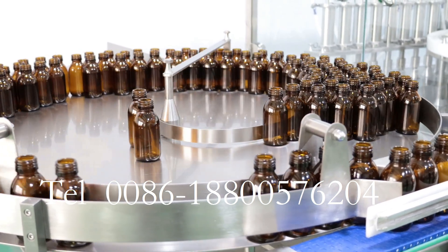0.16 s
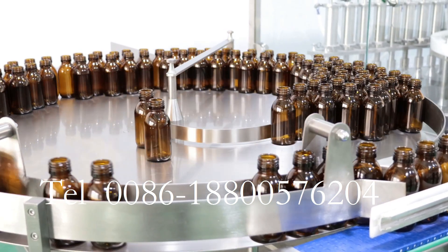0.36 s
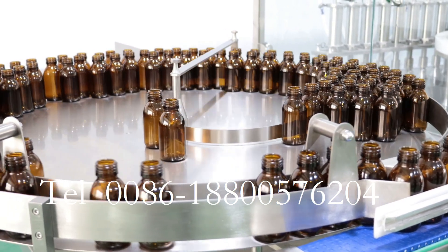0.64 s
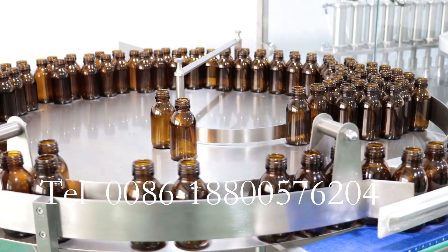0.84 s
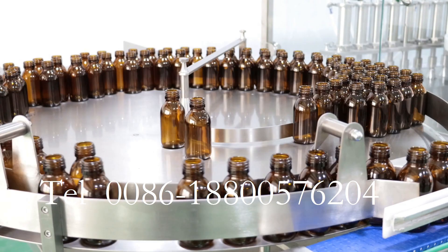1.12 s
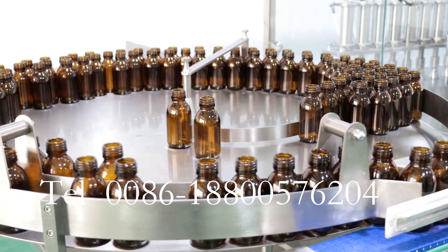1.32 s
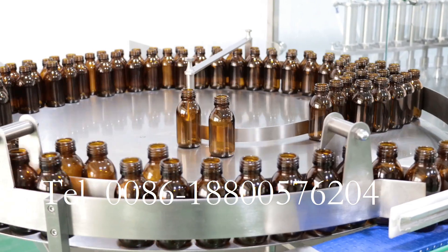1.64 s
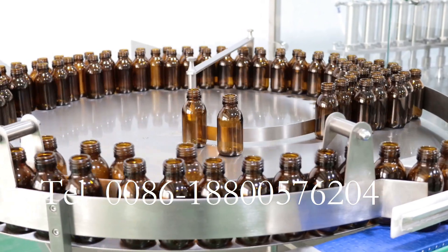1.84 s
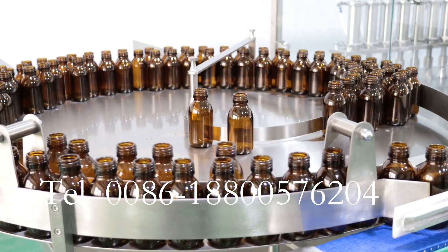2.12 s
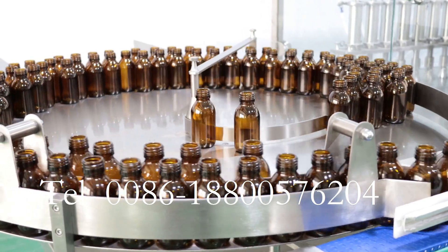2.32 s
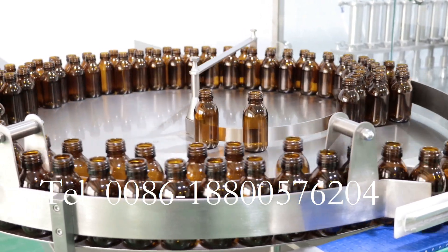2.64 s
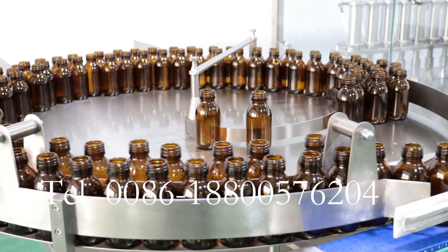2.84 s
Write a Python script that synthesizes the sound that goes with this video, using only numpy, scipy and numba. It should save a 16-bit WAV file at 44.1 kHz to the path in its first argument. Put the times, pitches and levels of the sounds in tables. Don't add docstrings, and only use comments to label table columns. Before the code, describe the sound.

Small glass bottles clatter and clink restlessly on a steel table over a steady factory motor drone

```python
import sys
import numpy as np
from scipy import signal
from scipy.io import wavfile
from scipy.ndimage import uniform_filter1d
from numba import njit

SR = 44100
rng = np.random.default_rng(int(sys.argv[2]) if len(sys.argv) > 2 else 0)


def volts_from_db(level):
    exponent = np.asarray(level, float) / 20
    return 10 ** exponent


def put_to_file(sound):
    columns = np.atleast_2d(sound).T
    safe = np.clip(columns, -1, 1)
    whole_steps = np.round(safe * 32767)
    wavfile.write(sys.argv[1], SR, whole_steps.astype(np.int16))


N = 130977

# (frequency [Hz], level [dB per Hz])
DRONE = [(25, -46), (70, -26), (170, -16), (330, -12.5), (560, -19.5), (1450, -9), (2800, -8.5),
         (6500, -35.5)]
# (frequency [Hz], level [dB], width [Hz])
HUM = [(233.5, -54, 7.4), (445, -54.5, 40), (324, -59, 8.9), (72, -57, 95)]
# (start [s], length [s], from pitch [Hz], to pitch [Hz], level [dB])
GROAN = (.45, .18, 160, 212, -39)
# (time [s], level [dB], glass level [dB], knock pitch [Hz])
JOSTLE = [(0.0, -33.5, -7.5, 1900), (0.33, -21, -12.5, 1920), (0.43, -26, -15, 1825),
          (0.79, -22, -9.5, 1820), (1.12, -25.5, -8.5, 1800), (1.26, -28, -14.5, 1905),
          (1.76, -35.5, -9.5, 1930), (2.18, -27, -15.5, 1910), (2.52, -28, -9.5, 2010),
          (2.7, -26, -8.5, 2030), (2.97, -28, -7, 1970)]
# (frequency [Hz], level [dB], T60 [s], spread between bottles [0-1])
GLASS_MODES = [(4324, -7, 0.063, 0.1), (5530, -10.5, 0.067, .03), (7487, -1, 0.046, 0.02),
               (8580, -7.5, 0.065, 0.12), (9730, -9, 0.11, 0.04), (10580, -12.5, 0.064, 0.03),
               (11340, -18.5, 0.082, 0.07), (13600, -38, 0.083, 0.1), (12920, -8.5, 0.044, 0.08),
               (15100, -15, 0.048, 0.05)]
# (frequency [Hz], level [dB])
TICK = [(3300, 10), (4500, -5), (6500, 5), (9000, 1), (12000, -52), (16000, -26)]
# (time [s], level [dB], knock pitch [Hz], glass level [dB], length [s])
SHOVES = [(0.2267, -12.5, 1220, -11.5, 0.026), (0.2867, -8.5, 2640, -20.5, 0.023),
          (0.3454, -9.5, 2160, -19.5, 0.029), (0.495, -4, 1080, -12, 0.025),
          (0.5154, 0.5, 2315, -15.5, 0.025), (0.5758, -3, 2550, -15, 0.03), (0.6807, -11, 1280, -13, 0.024),
          (0.734, -14.5, 2290, -10, 0.027), (0.8553, -2.5, 2080, -15.5, 0.026),
          (0.9048, -4.5, 2290, -14.5, 0.027), (0.9365, -16, 2020, -13.5, 0.029),
          (1.167, -1, 2740, -23.5, 0.034), (1.437, -4, 2780, -18.5, 0.015),
          (1.4717, -6.5, 2830, -32, 0.029), (1.519, -13.5, 1540, -17.5, 0.025),
          (1.808, -6.5, 1980, -11.5, 0.027), (1.9013, -4, 2435, -22.5, 0.024),
          (2.038, -5.5, 1680, -16, 0.026), (2.0988, -6.5, 1330, -16, 0.029),
          (2.165, -8, 1330, -13.5, 0.022), (2.2794, -14, 2900, -18.5, 0.023),
          (2.6122, -11, 2640, -11, 0.024), (2.736, -3.5, 3000, -22.5, 0.03),
          (2.836, -9.5, 1670, -14.5, 0.028)]
# (time [s], level [dB], knock pitch [Hz], glass level [dB], length [s])
BUMPS = [(0.0133, -5, 1830, -16, 0.007), (0.117, -7.5, 1940, -22, 0.0083),
         (0.207, -1.5, 2620, -12.5, 0.0085), (0.2058, -2.5, 1490, -11, 0.0093),
         (1.109, -18, 1490, -2.5, 0.01), (1.8044, -5.5, 2010, -14, 0.0083), (1.8358, -1, 2620, -23, 0.0097),
         (2.2079, 1.5, 2530, -11, 0.009), (2.2541, 0, 2460, -14, 0.009), (2.2665, -1.5, 2920, -17, 0.01),
         (2.3427, -7, 2780, -35, 0.0072), (2.6052, 2.5, 2900, -15, 0.0098), (2.7663, -2.5, 2640, -30, 0.01),
         (2.8925, -1, 2800, -21.5, 0.009)]
# (time [s], level [dB], knock pitch [Hz], glass level [dB], length [s])
CLINKS = [(.086, -14, 1320, -19, 0.0013), (.2085, 0, 1510, -17, .002), (.2115, -4, 2600, -15, .002),
          (.2982, -14, 2560, -24, .002), (.3544, -11, 2200, -23, 0.0016), (.484, -13, 2410, -13, .0015),
          (.5, -5, 1270, -22, .0017), (.688, -3, 2160, -20, .0018), (.859, -6, 2150, -18, 0.0015),
          (.913, -3, 2010, -23, 0.0015), (.943, -5, 1990, -20, 0.0016), (.956, -15, 1980, -20, .0017),
          (1.1735, -11.5, 2760, -23, 0.0019), (1.2, -13, 2790, -25, .0014),
          (1.3494, -10, 2530, -25, 0.0022), (1.402, -8.5, 2400, -14, .0013),
          (1.408, -11, 2580, -17, 0.0019), (1.4245, -11.5, 1450, -14, .0017),
          (1.4406, -14, 2860, -26, 0.0018), (1.532, -6.5, 1510, -18, .0017),
          (1.6112, -9.5, 1640, -19, 0.0017), (1.707, -12, 1750, -30, .0014),
          (1.772, -14, 1730, -23, 0.0017), (1.8074, -3, 1920, -17, 0.0012),
          (1.8165, -4.5, 2130, -19, 0.0015), (1.831, -2, 2440, -16, 0.0018), (1.8435, -3, 2420, -18, .0017),
          (1.906, -7, 2080, -14, 0.0014), (2.164, -12, 1090, -25, .0014), (2.212, -2.5, 2500, -14, 0.0021),
          (2.327, -11, 2570, -24, 0.00153), (2.496, -12.5, 1470, -12, 0.0014),
          (2.5653, -4, 2150, -24, .0016), (2.629, -5, 2740, -18, .0019), (2.684, -10, 1770, -24, 0.0019),
          (2.7382, -8, 2770, -20, 0.0016), (2.755, -8, 2770, -20, 0.0014), (2.893, -3, 2840, -22, .002),
          (2.9004, -8, 2620, -24, .0016), (2.909, -4, 2770, -21, .0015)]
# (time [s], frequency [Hz], level [dB], T60 [s])
RINGS = [(.015, 5110, -26, 0.13), (1.349, 2600, -17, 0.032), (2.05, 5430, -32.5, 0.25),
         (2.111, 5560, -29.5, 0.32), (2.17, 6300, -33, 0.25), (.21, 445, -41, 0.68), (.48, 445, -38, 0.61),
         (1.17, 603, -34.5, 0.4), (2.76, 2800, -25, .08), (2.895, 2800, -19, .07),
         (2.265, 2870, -15, 0.066)]
# (time [s], length [s])
BASS_DROPS = [
    (.63, 0.16),
    (.86, 0.19),
    (1.156, .07),
    (1.293, 0.074),
    (1.82, 0.15),
    (2.015, 0.049),
    (2.086, 0.047),
    (2.18, 0.18),
    (2.74, 0.081),
    (2.83, .07),
]

DRONE_DB, JOSTLE_DB, SHOVE_DB, BUMP_DB, CLINK_DB = -28.5, -2, -15.5, -13.5, -7
JOSTLE_GLASS_DB, SHOVE_GLASS_DB, BUMP_GLASS_DB, CLINK_GLASS_DB = -4, 9.5, 4, 3
JOSTLE_SPREAD, SHOVE_SPREAD, BUMP_SPREAD = 0.306, 0.196, 0.091
SHOVE_RISE, BUMP_RISE, FADE_DB = 0.24, 0.05, 4.5
KNOCK_T60_S, KNOCK_LOW_HZ, KNOCK_TOP_HZ = 0.015, 950, 3300
NECK_HZ, NECK_SPREAD, BODY_HZ = 1280, 0.14, 2200
NECK_DB_PER_OCT = 6.5
TICK_DB, TICK_T60_S, CHATTER_S = -0.5, 0.007, 0.008
TABLE_HZ, TABLE_DB, TABLE_T60_S = 589, -23, 0.05
SCATTER_DB, MODE_SCATTER_DB = 1.3, 2.2
PAN_DB, PAN_SPREAD_DB, LAG_S, LAG_SPREAD_S = -2, 1, 3e-5, 7e-5
HALL_DB, HALL_T60_S, HALL_TOP_HZ, HALL_WIDE, HALL_WIDE_HZ = -5.5, 0.25, 5500, 0.63, 1410
NEAR_WET_DB = -4


def on_log(table, hz):
    curve = np.array(table)
    return np.interp(np.log(hz), np.log(curve[:, 0]), curve[:, 1])


def band(hz, width):
    peak = signal.iirpeak(hz, hz / width, SR)
    x = signal.lfilter(*peak, signal.lfilter(*peak, rng.standard_normal(N)))
    return x / x.std()


def walk(rate):
    k = int(SR / rate)
    held = np.repeat(rng.standard_normal(N // k + 1), k)
    return uniform_filter1d(uniform_filter1d(held, k), k)[:N]


def drone():
    noise = 0
    for hz in 28 * 2 ** np.arange(0, 8.1, 0.5):
        width = min(0.2 + 20 / hz + hz / 2500, 1)
        both = band(hz, hz / 2) + width * band(hz, hz / 2) * np.array([[1], [-1]])
        level_db = on_log(DRONE, hz) + 10 * np.log10(hz) + 1.5 * walk(6.73)
        noise = noise + volts_from_db(level_db) * both
    hums = sum(volts_from_db(db + 2.7 * walk(5.56)) * band(hz, width) for hz, db, width in HUM)
    return noise * volts_from_db(DRONE_DB) / noise.std() + hums


def groan():
    start, length, low_hz, top_hz, db = GROAN
    progress = np.clip((np.arange(N) / SR - start) / length, 0, 1)
    hz = (low_hz + (top_hz - low_hz) * progress ** 2) * (1 + 0.02 * walk(40))
    swell = volts_from_db(db + 2 * walk(37)) * np.sin(np.pi * progress)
    return swell * np.sin(2 * np.pi * np.cumsum(hz) / SR)


def hall(x):
    t = np.arange(SR // 2) / SR
    mid, side = rng.standard_normal((2, len(t))) * volts_from_db(-60 * t / HALL_T60_S) * (t > 0.003)
    side = HALL_WIDE * signal.lfilter(*signal.butter(1, HALL_WIDE_HZ, "high", fs=SR), side)
    tail = signal.lfilter(*signal.butter(1, HALL_TOP_HZ, fs=SR), [mid + side, mid - side])
    tail = tail * volts_from_db(HALL_DB) / np.sqrt((tail ** 2).sum() / 2)
    echoes = signal.fftconvolve(x.mean(axis=0)[None], tail, axes=1)[:, :N]
    return echoes * volts_from_db(np.array([[PAN_DB], [-PAN_DB]]) / 2)


@njit
def ring(start, hz, t60, gain, n, sr):
    out = np.zeros((2, n))
    for j in range(len(hz)):
        s = (2j * np.pi * hz[j] - np.log(1000.) / t60[j]) / sr
        turn = np.exp(s)
        for c in range(2):
            first = int(np.ceil(start[c, j]))
            z = gain[c, j] * np.exp(s * (first - start[c, j]))
            for i in range(first, min(n, first + int(.65 * t60[j] * sr))):
                if i >= 0:
                    out[c, i] += z.imag
                z *= turn
    return out


def touches(t, db, hz, glass_db, spread):
    n = len(t)
    hz, glass_db = hz[:, None], glass_db[:, None]
    mode_hz, mode_db, mode_t60, mode_spread = np.array(GLASS_MODES).T
    luck = rng.standard_normal((n, 42))
    flat = rng.random((n, 28))

    main = hz * np.exp(spread * luck[:, :1])
    neck = NECK_HZ * np.exp(NECK_SPREAD * luck[:, 1:2])
    body = BODY_HZ + (KNOCK_TOP_HZ - BODY_HZ) * flat[:, 7:8]
    knock = np.hstack([main, neck, body])
    wall = mode_hz * (1 + mode_spread * luck[:, 3:13])
    tick = TICK[0][0] * (TICK[-1][0] / TICK[0][0]) ** flat[:, :6]
    thud = TABLE_HZ * np.exp(0.84 * luck[:, 13:14])
    f = np.hstack([knock, wall, tick, thud])
    t60 = np.concatenate([np.full(3, KNOCK_T60_S), mode_t60, np.full(6, TICK_T60_S), [TABLE_T60_S]])

    knock_size = 1 / np.sqrt((1 + (knock / KNOCK_TOP_HZ) ** 14) * (1 + (KNOCK_LOW_HZ / knock) ** 10))
    other_db = -NECK_DB_PER_OCT * np.abs(np.log2(hz / knock[:, 1:]))
    knock_size = knock_size * volts_from_db(np.hstack([np.full((n, 1), 2), other_db]))
    wall_size = volts_from_db(mode_db + glass_db)
    tick_size = volts_from_db(on_log(TICK, tick) + TICK_DB + glass_db)
    size = np.hstack([knock_size, wall_size, tick_size, np.full((n, 1), volts_from_db(TABLE_DB))])
    size = size * volts_from_db(MODE_SCATTER_DB * luck[:, 14:34]) * np.sign(luck[:, 22:42])
    force_db = db - SCATTER_DB * (np.log(flat[:, 6]) + 1)
    size = size * volts_from_db(force_db)[:, None]

    pan = (PAN_DB + PAN_SPREAD_DB * luck[:, 40])[:, None]
    lag = LAG_S + LAG_SPREAD_S * luck[:, 41]
    start = np.repeat(np.array([t + lag / 2, t - lag / 2]) * SR, f.shape[1], axis=1)
    chatter = CHATTER_S * SR * flat[:, 8:] * (f > KNOCK_TOP_HZ)
    start = start + chatter.ravel()
    gain = np.array([size * volts_from_db(pan / 2), size * volts_from_db(-pan / 2)]).reshape(2, -1)
    return start, np.clip(f, 60, 0.45 * SR).ravel(), np.tile(t60, n), gain


def jostle(count):
    t = rng.random(count) * N / SR
    times, *curves = np.array(JOSTLE).T
    db, glass_db, hz = (np.interp(t, times, curve) for curve in curves)
    return touches(t, db + JOSTLE_DB, hz, glass_db + JOSTLE_GLASS_DB, JOSTLE_SPREAD)


def runs(table, db, glass_db, spread, rise, count):
    row = np.repeat(np.array(table), count, axis=0)
    time, push_db, hz, push_glass_db, length = row.T
    order = np.arange(len(row)) % count + 0.5 * rng.random(len(row))
    late = 2 * (order / count) ** 1.15
    shape_db = 20 * np.log10(np.clip((late + 0.05) / rise, 0.1, 1)) - FADE_DB * late
    return touches(time + late * length, push_db + db + shape_db, hz, push_glass_db + glass_db, spread)


def near_rim(thin):
    clinks = runs(CLINKS, CLINK_DB, CLINK_GLASS_DB, BUMP_SPREAD, 0.05, count=2)
    near = signal.sosfilt(thin, ring(*clinks, N, 1. * SR))
    time, hz, db, t60 = np.array(RINGS).T
    start, gain = np.tile(time * SR, (2, 1)), np.tile(volts_from_db(db), (2, 1))
    return near + ring(start, 1. * hz, 1. * t60, gain, N, 1. * SR)


def crowd_touches():
    parts = (runs(SHOVES, SHOVE_DB, SHOVE_GLASS_DB, SHOVE_SPREAD, SHOVE_RISE, count=36),
             jostle(count=2400),
             runs(BUMPS, BUMP_DB, BUMP_GLASS_DB, BUMP_SPREAD, BUMP_RISE, count=10))
    return [np.concatenate(p, axis=-1) for p in zip(*parts)]


def scene():
    thin = signal.butter(4, 660, "high", fs=SR, output="sos")
    modes = crowd_touches()
    out = drone() + groan()
    for group in range(7):
        share = [np.ascontiguousarray(m[..., group::7]) for m in modes]
        glass = signal.sosfilt(thin, ring(*share, N, 1. * SR))
        out = out + glass + hall(glass)
    near = near_rim(thin)
    return out + near + volts_from_db(NEAR_WET_DB) * hall(near)


def band_limit(x):
    return signal.sosfilt(signal.butter(12, 16030, fs=SR, output="sos"), x)


def record(dry):
    x = signal.sosfilt(signal.butter(2, 140, "high", fs=SR, output="sos"), dry)
    t = np.arange(N) / SR
    shut = sum(1. * (t > start) * (t < start + length) for start, length in BASS_DROPS)
    shut = np.clip(uniform_filter1d(shut, int(0.025 * SR)), 0, 1)
    deep = signal.sosfiltfilt(signal.butter(5, 185, fs=SR, output="sos"), x)
    x = np.clip(x - 0.96 * deep * shut, -1, 1)
    x = signal.sosfilt(signal.ellip(10, 0.3, 80, 15650, fs=SR, output="sos"), x)
    return band_limit(x)


dry = scene()
out = record(dry)
put_to_file(out)
```